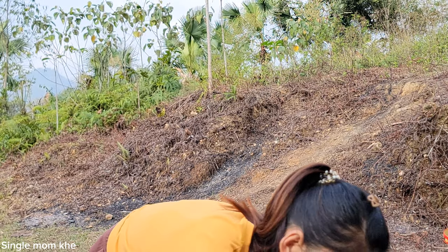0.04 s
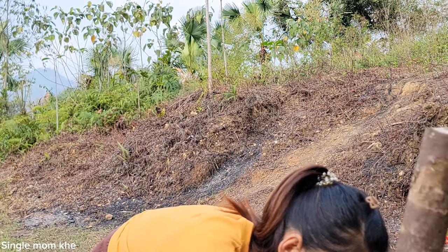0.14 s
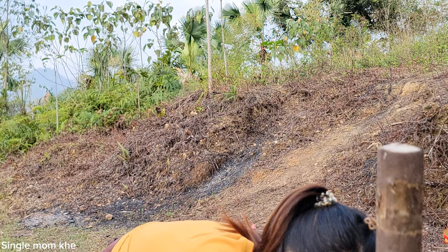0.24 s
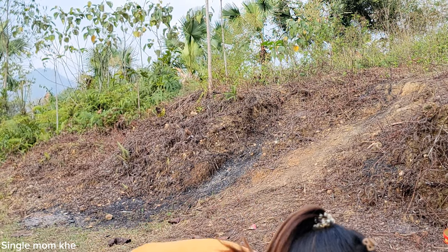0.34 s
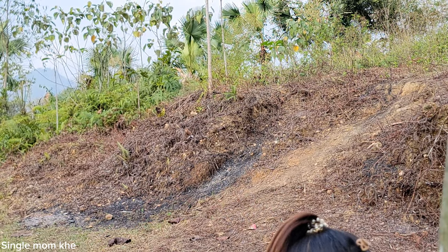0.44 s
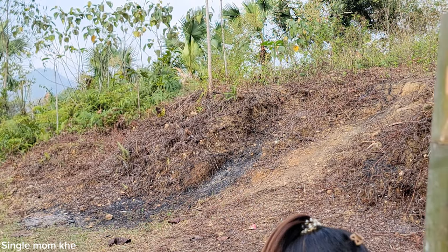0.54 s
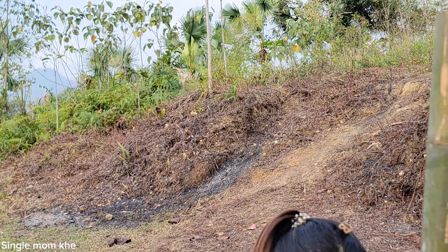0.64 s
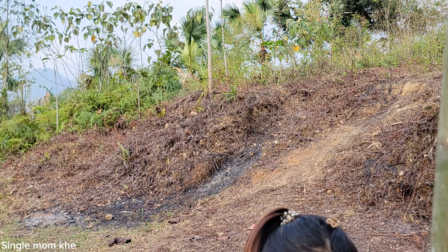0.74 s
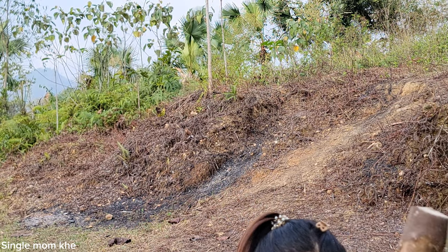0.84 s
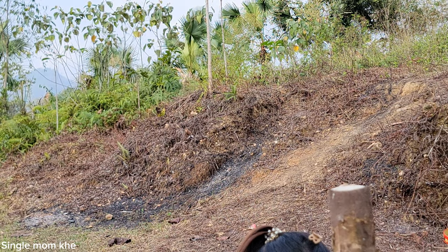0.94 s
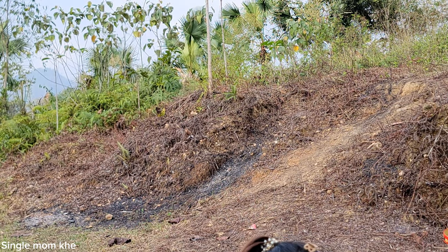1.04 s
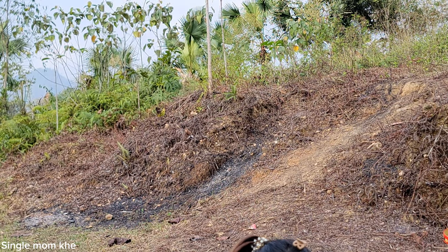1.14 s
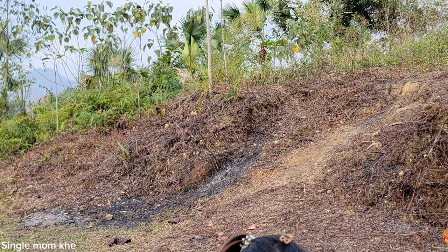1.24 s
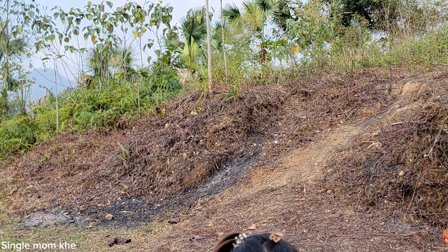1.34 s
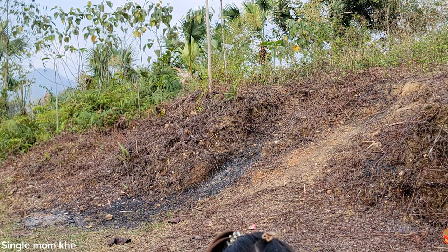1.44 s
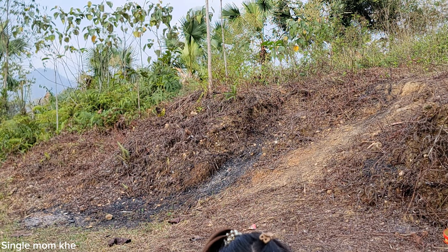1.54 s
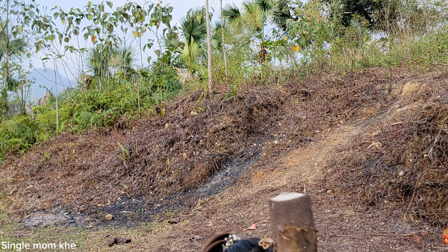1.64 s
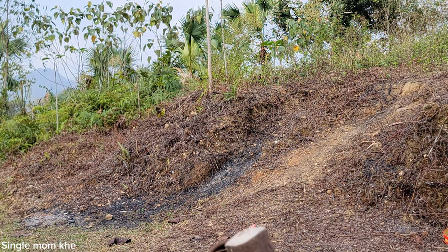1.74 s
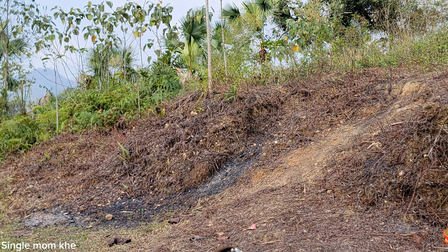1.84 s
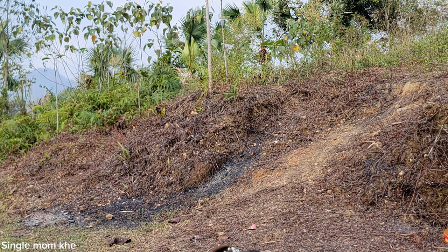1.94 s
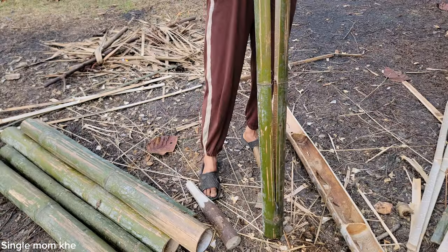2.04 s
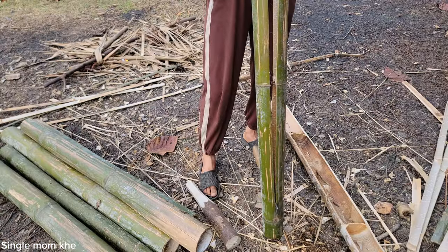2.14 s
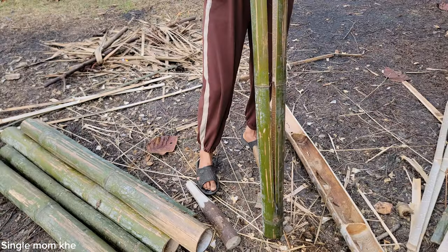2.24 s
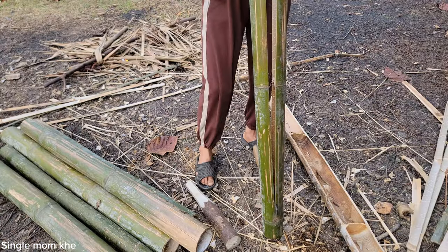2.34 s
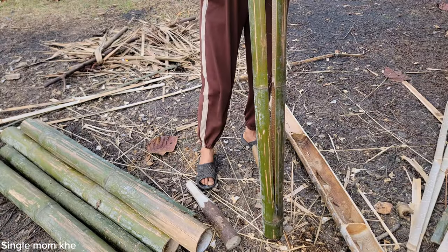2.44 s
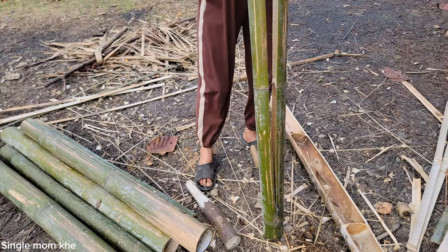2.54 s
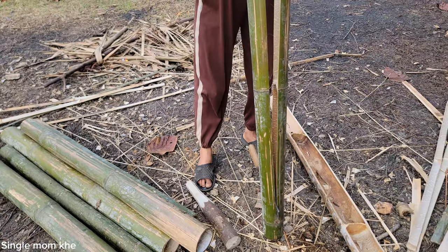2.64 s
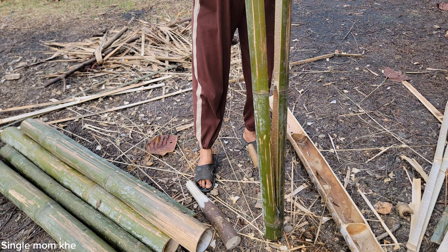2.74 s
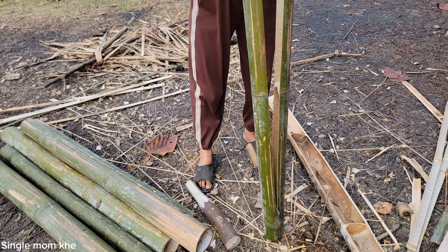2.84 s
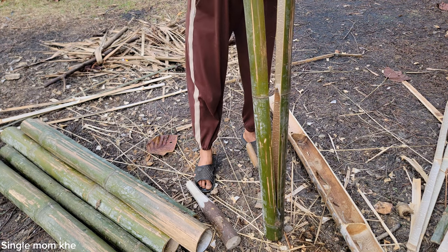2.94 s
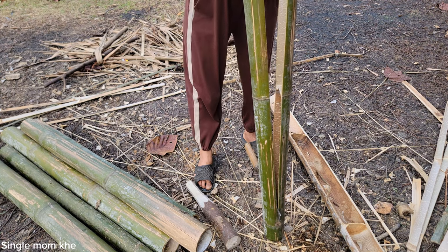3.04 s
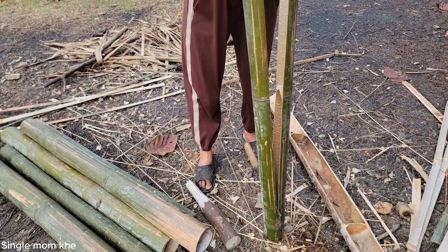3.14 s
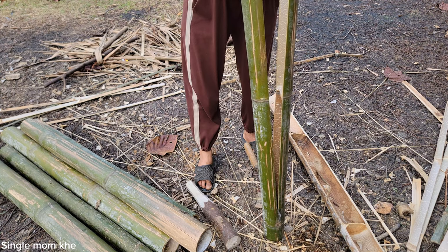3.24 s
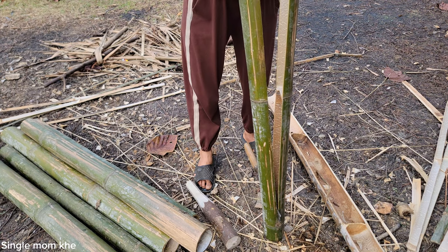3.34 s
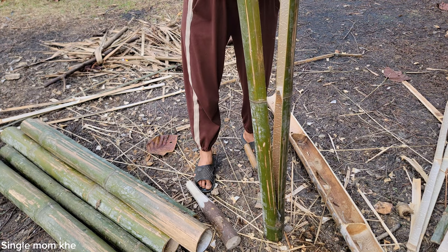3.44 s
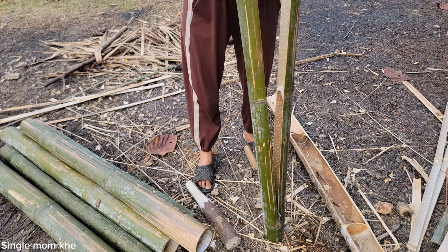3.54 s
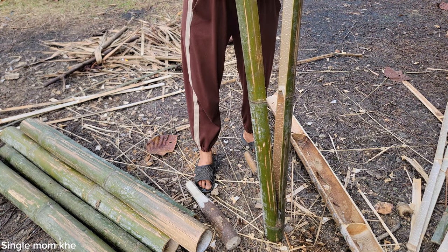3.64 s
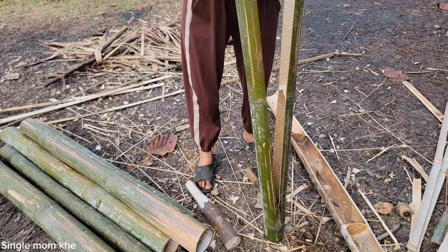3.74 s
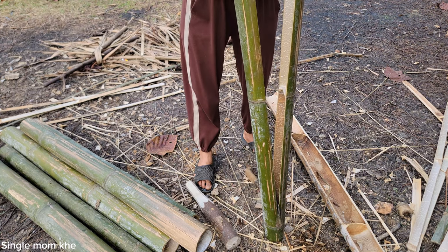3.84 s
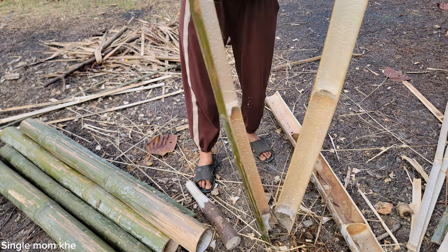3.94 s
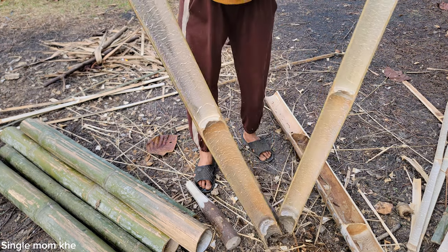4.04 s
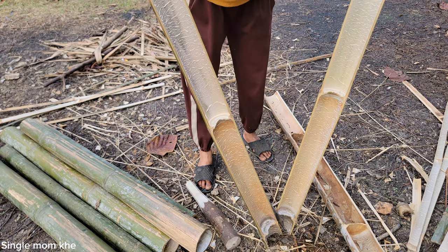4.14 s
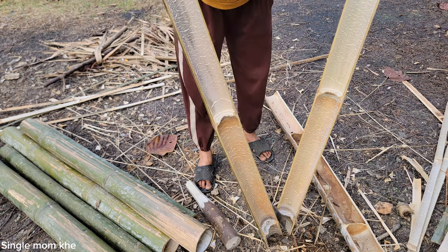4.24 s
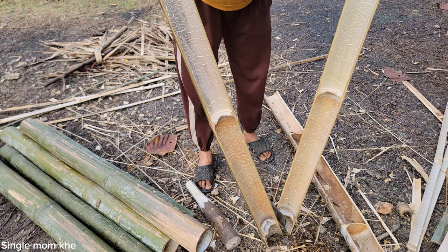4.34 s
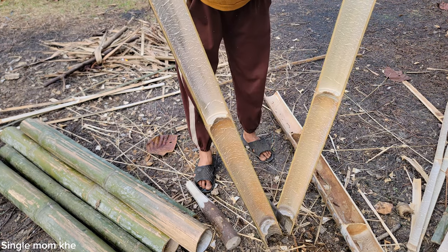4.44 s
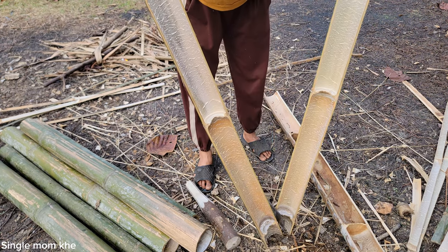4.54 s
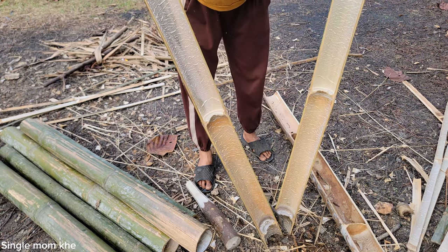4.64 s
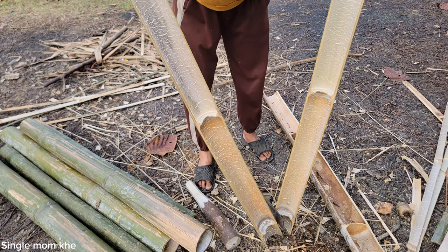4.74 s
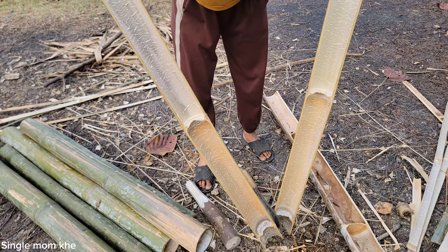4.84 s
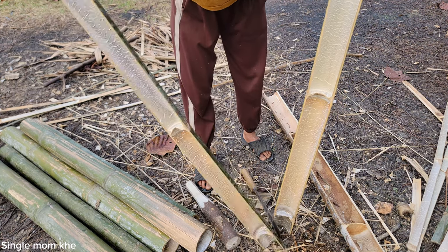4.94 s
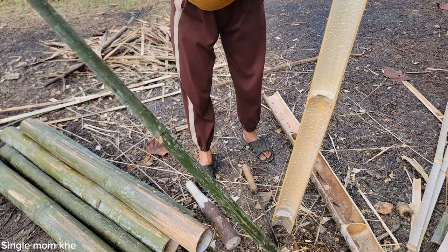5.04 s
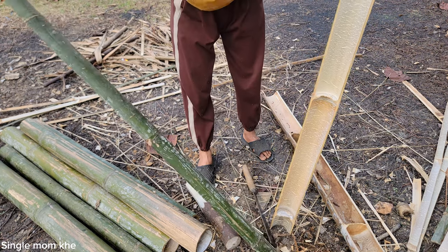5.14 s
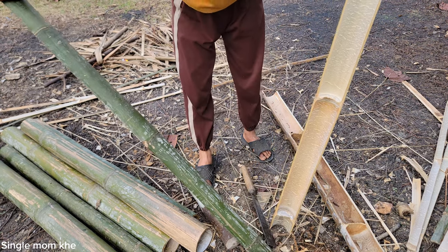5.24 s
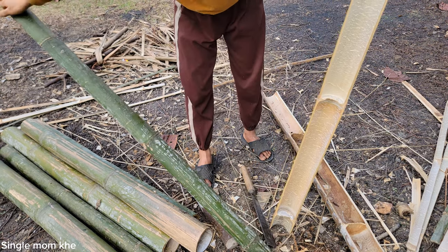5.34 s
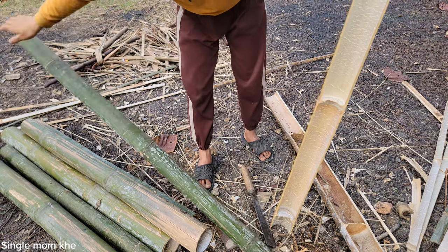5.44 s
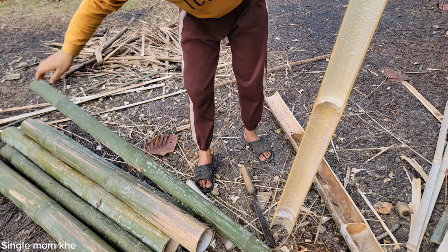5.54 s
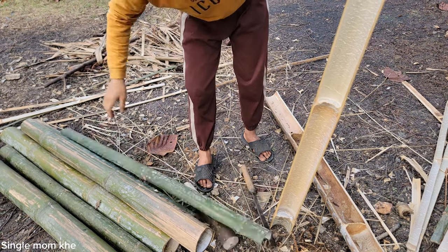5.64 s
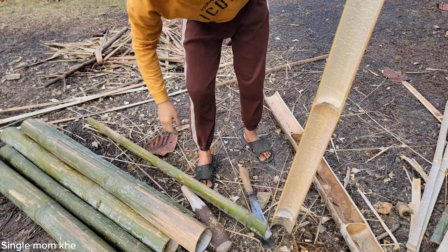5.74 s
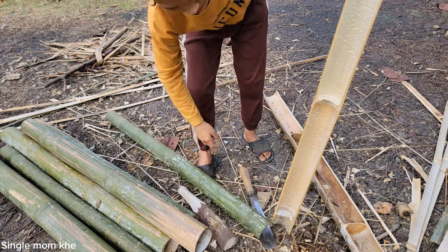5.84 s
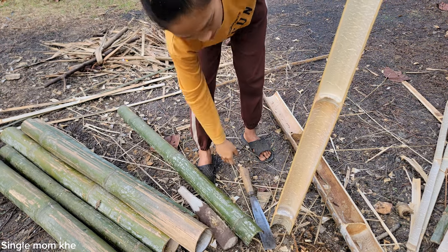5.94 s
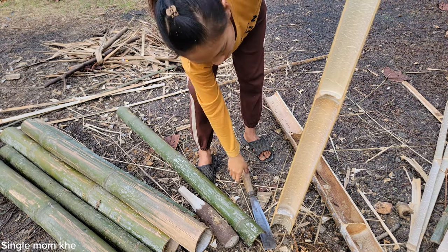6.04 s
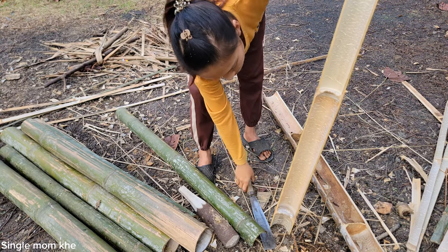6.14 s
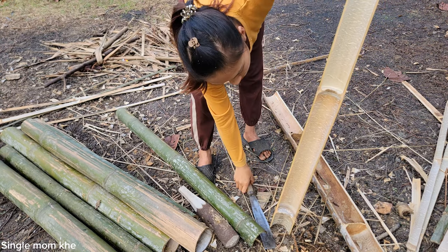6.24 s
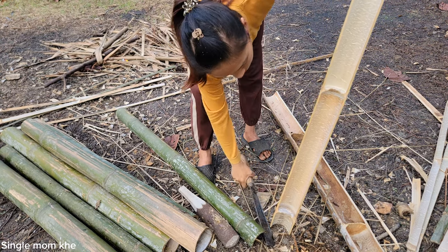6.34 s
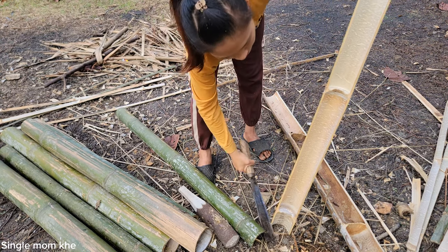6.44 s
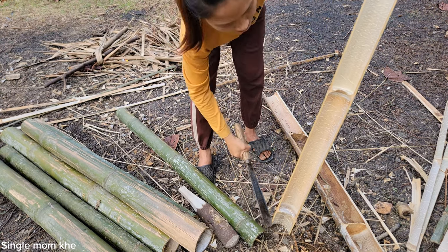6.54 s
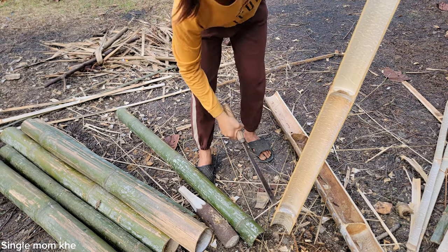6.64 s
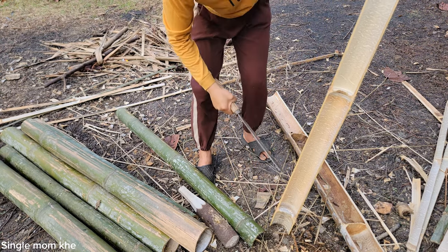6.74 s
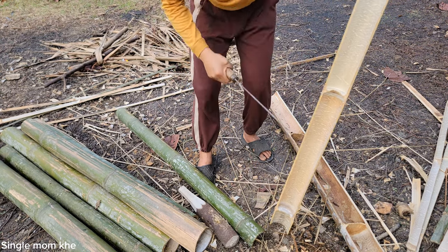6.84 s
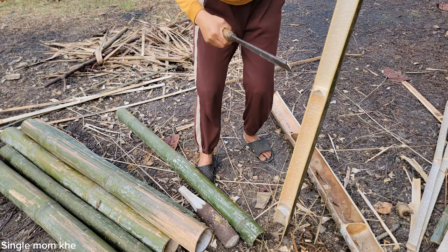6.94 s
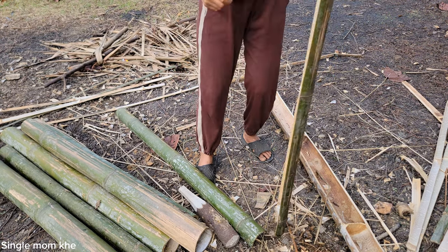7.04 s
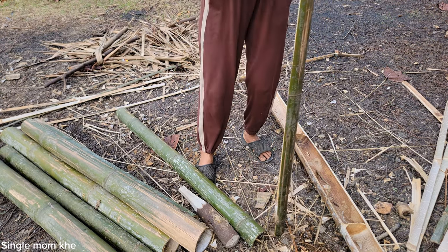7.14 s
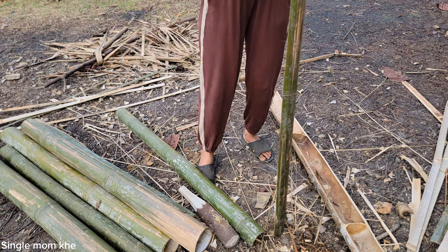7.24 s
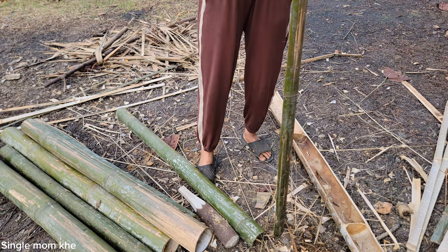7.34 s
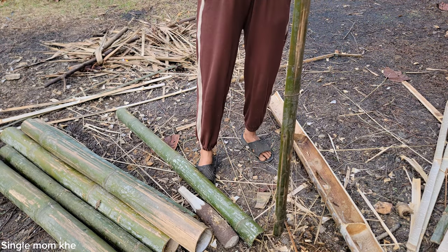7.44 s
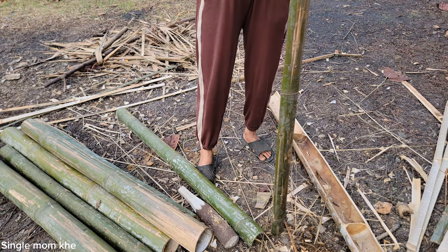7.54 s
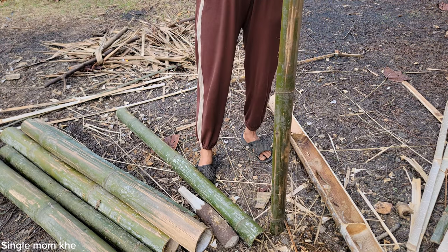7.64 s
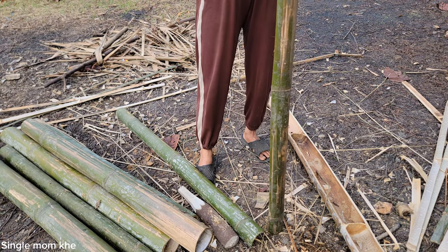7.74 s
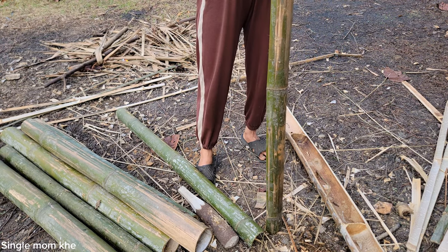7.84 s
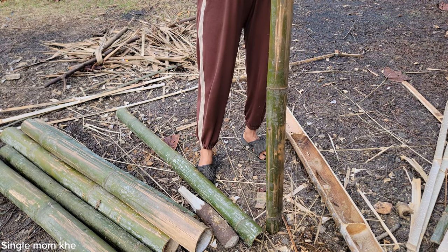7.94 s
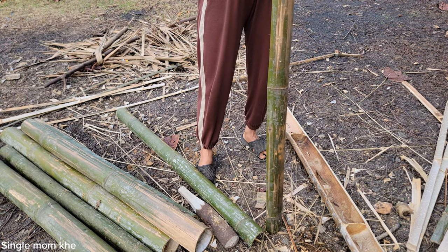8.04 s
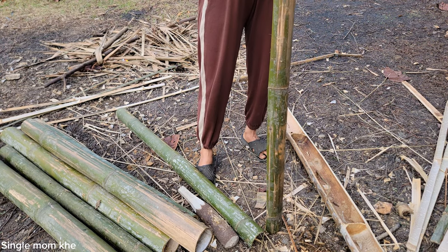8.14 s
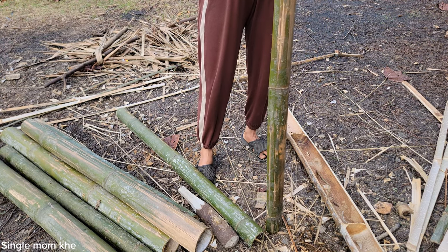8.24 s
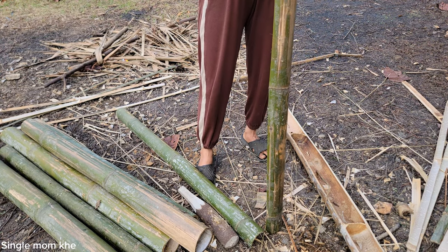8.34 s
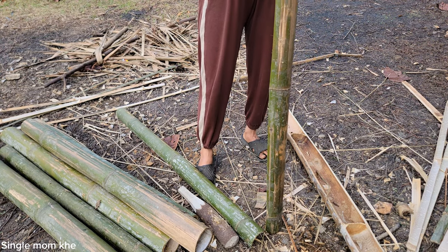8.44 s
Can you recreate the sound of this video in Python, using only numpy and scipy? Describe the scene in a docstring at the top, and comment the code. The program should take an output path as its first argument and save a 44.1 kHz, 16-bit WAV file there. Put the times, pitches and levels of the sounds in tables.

```python
"""A bamboo pole is split in a forest clearing: a club hits a knife three times and the hollow pole rings.
After a sudden change of scene the pole is prised apart, cracking in jumps until its last fibres tear.
One half falls and bounces, bamboo scrapes through dry litter, and the knife is picked up from the ground
and set into the other half. Behind the work, cicadas drone, a small bird calls and the air softly hisses."""
import sys
import numpy as np
from scipy import signal
from scipy.fft import rfft, irfft, next_fast_len
from scipy.io import wavfile
from scipy.ndimage import uniform_filter1d

SR = 44100
rng = np.random.default_rng(int(sys.argv[2]) if len(sys.argv) > 2 else 0)


def digitize_waveform(pressure):
    """Quantize a signal to 16-bit integers and store it at the path in sys.argv[1].

    Rows of a 2-D input are taken as channels; values are limited to [-1, 1].
    """
    field = np.atleast_2d(pressure).T
    bounded = np.clip(field, -1, 1)
    quanta = np.round(bounded * 32767).astype(np.int16)
    wavfile.write(sys.argv[1], SR, quanta)


N = 374409
TIME = np.arange(N) / SR
SCENE_CHANGE_S = 2.07

# A "hit" is one short sound: start_s, level_db, tilt_db_per_octave, pitch_hz.
# More tilt sounds brighter; the hit stirs the notes near its pitch most.
# The club lands on the knife: the four hit columns, then a fainter lead-in just before the blow
# and the blade's bite: lead_in_s, lead_in_db, lead_in_tilt_db_per_octave, bite_delay_s, bite_hz
CLUB_BLOWS = [(.3632, -13, .2, 900, .0098, -18.5, -2.3, .0036, 1110),
              (1.0992, -13, -1.7, 1110, .003, -22, 1, .0085, 1050),
              (1.8652, -12, 1.2, 576, .007, -24, -5, .003, 3000)]
# The wood gives a little after a blow: the four hit columns
SETTLING = [(.4125, -28, 2, 2980), (.673, -50, 3, 1276), (1.352, -57, 6, 3000)]
# Cracks along the grain and a few light knocks: the four hit columns
CRACKS_AND_KNOCKS = [(2.7005, -25, 0, 3010), (2.7085, -19.5, -.5, 1600), (2.946, -27.5, 0, 595),
                     (3.375, -57.5, 7.5, 3600), (3.5105, -23.5, 4.3, 1400), (3.6318, -27, 2.7, 606),
                     (3.697, -48.5, 7, 3010), (3.842, -27, -1, 1442), (3.8485, -14.5, -.7, 1116),
                     (3.941, -35.5, -4, 1450), (3.9765, -45.5, 1, 1900), (4.0165, -50.5, -2.5, 1600),
                     (4.917, -51.5, 1, 1600), (4.988, -52, -1, 1600), (6.672, -62, 8, 3000),
                     (7.279, -52, 4.5, 1600), (7.833, -56.5, 7, 1900), (8.435, -24.5, .7, 1900)]
# The split sticks and slips: the four hit columns, length_s, gap_s
CRACK_RUNS = [(2.7262, -22, 2.7, 3000, .085, .0147), (3.589, -44, 3, 4000, .044, .022)]
# A loose half lands, one end first: the four hit columns, second_end_delay_s, second_end_db
LANDINGS = [(3.718, -49, 1.5, 280, .013, -57.5), (3.786, -42, 2, 1030, .024, -49),
            (3.852, -32.5, -2.5, 290, .025, -48), (5.144, -34, .5, 1830, 0.024, -44),
            (5.472, -53, -3.5, 183, 0.033, -51), (5.5346, -31, -1, 900, .022, -41.5),
            (5.584, -28.5, -3.5, 290, .012, -36), (5.603, -15.5, 2.3, 497, .028, -21.5),
            (5.608, -11.5, .7, 760, .029, -24), (5.708, -33.5, -12.5, 280, .0265, -39),
            (5.7344, -28, 1.5, 2300, .0145, -25), (5.769, -23.5, -1.5, 930, .014, -26.5),
            (5.838, -42, 1, 1270, .027, -36.5), (5.925, -28.5, -3.5, 493, 0.046, -45),
            (6.04, -51.5, 2, 768, .033, -53.5), (7.378, -61, 2.5, 1277, .027, -58.5),
            (7.849, -54, 3.5, 1296, 0.09, -64.5), (8.437, -36.5, -4.5, 300, 0.017, -54)]
# The knife drags over grit: the four hit columns, length_s, gap_s
KNIFE_DRAGS = [(6.41, -56, -4.5, 2200, 0.024, .011), (6.444, -49.5, -4.5, 2400, 0.049, .0095)]

# Notes that ring in the whole pole, the split and a loose half: pitch_hz, level_db, fade_s
# (a fade time is how long a sound takes to drop by 60 dB)
POLE_NOTES = [(123, -27, 0.59), (179.6, -20.5, .7), (318, -18.5, 0.25), (511, -8.5, .17), (600, -13.5, .13),
              (723, -8.5, 0.19), (860, -2.5, 0.027), (1087, 5, 0.038), (1189, -8, 0.17), (1310, -5, 0.13),
              (1453, -9, 0.12), (1776, -14, 0.12), (2211, -16, .11), (2680, -12, .06), (3045, -7.5, 0.07)]
SPLIT_NOTES = [(594, -11, 0.17), (631, -14.5, 0.16), (733, -15, 0.093), (1003, -7.5, .05),
               (1266, -2, 0.057), (1520, -3, 0.017), (1608, -3, 0.091), (1980, -5.5, 0.033),
               (2825, -0.5, 0.037), (3130, 2, 0.038), (3608, -12, 0.035), (4617, -5.5, 0.045),
               (6470, -3.5, 0.028)]
HALF_NOTES = [(182.7, -17, .24), (283.4, -12, .19), (400, -5.5, 0.093), (489.3, -4, .17), (531, -10, 0.22),
              (759.6, -0.5, 0.14), (830.3, -10, 0.2), (1007, -3, 0.13), (1145, -5, .08), (1283, -5, 0.13),
              (1830, -10, 0.09), (2250, -21.5, 0.06), (2482, -9.5, 0.074), (4730, -15.5, .06)]
# Their clatter, a crowd of short-lived overtones: pitch_hz, level_db, fade_s
POLE_CLATTER = [(30, -21, .15), (69.6, -10, .15), (160, -5.5, .12), (300, -1.5, .1), (550, -1.5, 0.053),
                (1120, 0.5, 0.07), (1829, -6, 0.13), (2987, -2, .06), (4470, -12.5, 0.056),
                (6950, -19, 0.058), (9986, -27, .06), (15000, -29, 0.044)]
SPLIT_CLATTER = [(30, -29, .08), (120, -27, .08), (302, -13.5, 0.055), (590, -2.5, 0.053),
                 (1360, 1.5, 0.047), (2300, -1, 0.04), (3190, -3.5, 0.04), (5000, -1, .028),
                 (8000, -6, 0.023), (10500, -15, .022), (13500, -17, .02), (15960, -20, .02)]
HALF_CLATTER = [(30, -52, .09), (55.3, -32.5, .1), (95.1, -17, 0.13), (250, -2.5, 0.11), (500, 0, .09),
                (900, 2, 0.11), (1605, 3, 0.077), (2820, -4, 0.065), (4500, -8, 0.038), (6900, -16.5, .045),
                (10000, -32, 0.041), (15000, -30, 0.055)]

# The pole's foot shifts in dry litter: start_s, length_s, scrape_db, crackle_db (before a 7 dB lift)
PUSHES = [(2.27, .3, -71.5, -79), (3.691, 0.18, -75, -65.5), (4.018, 0.19, -58, -67),
          (4.35, 0.088, -69.5, -72), (4.72, .17, -62, -62.5), (4.859, .15, -57.5, -64.5),
          (4.967, .07, -53, -65), (6.402, 0.084, -60.5, -77), (6.811, 0.21, -54, -66.5),
          (6.947, .2, -64.5, -72), (7.45, .18, -70.5, -79), (7.736, 0.11, -70, -82.5)]
# Tone colour of tearing fibres, soil, dry shavings and still air: pitch_hz, level_db
FIBRE_COLOUR = [(60, -7), (200, -4), (600, -11), (1400, -8.5), (2500, -7.5), (4500, -7.5), (8000, -9),
                (11000, -16.5), (16000, -17.5)]
SOIL_COLOUR = [(60, -7), (200, -14.5), (500, -11.5), (800, -11.5), (1400, 1), (2000, -6), (3000, -13),
               (6000, -28)]
SHAVINGS_COLOUR = [(800, -24.5), (2500, 5.5), (4500, 3), (7500, 3), (10000, -5.5), (16000, -12.5)]
AIR_COLOUR = [(25, -3), (55, -8), (120, -15.5), (300, -27.5), (520, -23), (800, -26), (1300, -24),
              (2500, -29), (6000, -37), (10000, -46), (14000, -38.5), (16000, -42.5)]
# One insect's spells of trilling: start_s, end_s, level_db
TRILLS = [(.66, 1.065, -73.5), (2.08, 2.392, -69), (3.068, 3.481, -68), (4.487, 4.96, -73.5),
          (6.129, 6.56, -75)]
# The bird's calls: start_s, level_db
BIRD_CALLS = [(1.55, -60), (2.108, -59), (2.435, -60.5), (3.068, -60.5), (3.425, -61), (4.172, -66),
              (4.485, -65), (4.815, -62.5), (5.185, -67.5), (6.175, -64), (6.495, -65)]
# Echoes from the slope and trees: pitch_hz, level_db, fade_s
TREE_ECHOES = [(60.13, -8, 0.88), (180, 5.5, 0.99), (400, -4.5, 0.54), (1200, 1, .75), (3000, -2, 0.7),
               (7000, -0.5, 0.46), (15000, -12.5, .3)]
# How alike left and right are for near and far sounds: pitch_hz, likeness (1 means the same)
NEAR_LIKENESS = [(40, 0.9), (250, 0.97), (700, 0.45), (2000, .7), (6000, 0.41), (15000, 0.37)]
FAR_LIKENESS = [(40, 0.73), (250, 0.95), (700, 0.017), (2000, 0.053), (15000, 0.025)]
# Bands from bass to treble: centre_hz, width_hz, filter
EDGES_HZ = np.geomspace(24, 17000, 20)
BANDS = [(np.sqrt(low * high), high - low, signal.butter(2, [low, high], "band", fs=SR, output="sos"))
         for low, high in zip(EDGES_HZ, EDGES_HZ[1:])]


def club_blows():
    """The club drives the knife in, and the whole pole rings until the scene changes."""
    hits = list(SETTLING)
    for start, level_db, tilt, hz, lead_in_s, lead_in_db, lead_in_tilt, bite_s, bite_hz in CLUB_BLOWS:
        hits += [(start - lead_in_s, lead_in_db, lead_in_tilt, hz),   # a fainter lead-in
                 (start, level_db, tilt, hz),   # full blow
                 (start + bite_s, level_db - 3, tilt + 1, bite_hz),   # the blade enters the wood
                 (start + .0148, level_db - 7, tilt + 1.9, 1250)]   # the club chatters once on the blade
    blows = play_hits(hits, POLE_NOTES, POLE_CLATTER, ring_db=-2, snap=11, note_boost_db=12, detune=.006)
    blows = place(blows, lag_ms=.125, pan_db=-.45)
    blows = forest_echoes(blows, near_db=-15, near_fade_s=.13, far_db=-28.5)
    return blows * np.clip((SCENE_CHANGE_S - TIME) / .01, 0, 1)


def splitting():
    """The split runs down the pole in jumps, the last fibres tear, and a few light knocks follow."""
    hits = list(CRACKS_AND_KNOCKS) + stick_slip(CRACK_RUNS) + straining_fibres()
    wood = play_hits(hits, SPLIT_NOTES, SPLIT_CLATTER,
                     ring_db=-6, snap=7.4, note_boost_db=7.5, detune=.016)
    split = place(wood + tearing_fibres(), lag_ms=.068, pan_db=-1.65)
    return forest_echoes(split, near_db=-12, near_fade_s=.087, far_db=-30)


def stick_slip(runs, weaken_db=13, fall_octaves=4, tube_note_hz=600):
    """Sticking and slipping makes a row of nearly even hits that weaken and deepen as the strain eases."""
    hits = []
    for start, level_db, tilt, first_hz, length, gap in runs:
        for delay in np.arange(0, length, gap):
            progress = delay / length
            jitter_s = gap * rng.normal(0, .02)
            hz = max(first_hz / 2 ** (fall_octaves * progress), tube_note_hz)
            hits.append((start + delay + jitter_s, level_db - weaken_db * progress ** 3, tilt, hz))
    return hits


def straining_fibres(start_s=3.6, length_s=.24, count=3, level_db=-62, growth_db=7, tilt=5.5, hz=3000):
    """Single fibres snap at random, louder as the strain builds."""
    strains = (np.arange(count) + rng.random(count)) / count
    return [(start_s + strain * length_s, level_db + growth_db * strain ** 2, tilt, hz)
            for strain in strains]


def tearing_fibres(start_s=3.83, rise_s=.015, hold_s=.098, level_db=-40.5, surge_db=13, surge_s=.012):
    """The last fibres let go with a surge, rip steadily and quickly fall quiet."""
    t = TIME - start_s - rise_s
    gain = from_db(level_db + surge_db * np.exp(-np.abs(t) / surge_s))
    rise = np.clip(1 + t / rise_s, 0, 1)
    release = decay(np.clip(t - hold_s, 0, 1), fade_s=.2)
    rip = coloured(tiny_snaps(per_s=2100, spread_db=1), FIBRE_COLOUR, NEAR_LIKENESS)
    return gain * rise * release * rip


def loose_half():
    """A half pole bumps, falls and bounces: one end lands, then the other, which rebounds once."""
    hits = []
    for start, level_db, tilt, hz, gap, second_db in LANDINGS:
        hits += [(start, level_db, tilt, hz),
                 (start + gap, second_db, tilt + 1.2, hz * 1.02),   # the second end sounds brighter
                 (start + gap * 2.05, second_db - 10, tilt, hz)]
    bumps = play_hits(hits, HALF_NOTES, HALF_CLATTER, ring_db=1.5, snap=5.5, note_boost_db=9, detune=.006)
    falling = (TIME > 5.45) & (TIME < 6.3)
    fall = place(bumps * falling, lag_ms=-.12, pan_db=-1)   # reaches the left side first
    handling = place(bumps * ~falling, lag_ms=.065, pan_db=-1.5)
    return forest_echoes(fall + handling, near_db=-11, near_fade_s=.13, far_db=-31)


def knife_pickup():
    """The blade grates over grit, and its tip taps as it leaves the ground."""
    tip_hit = (6.495, -45.5, -3.5, 1450)
    ticks = play_hits([tip_hit] + stick_slip(KNIFE_DRAGS), HALF_NOTES, SPLIT_CLATTER,
                      ring_db=-14.5, snap=6, note_boost_db=4, detune=.029, clatter_boost_db=8.5)
    return place(ticks, lag_ms=.044, pan_db=-3)


def dry_litter(rise_share=.25, rise_db=12, fall_db=15):
    """Bamboo scrapes over soil and crushes dry shavings; each push swells, then fades."""
    gains = np.zeros((2, N))
    for start, length, scrape_db, crackle_db in PUSHES:
        past_peak = np.arange(int(2 * length * SR)) / (length * SR) - rise_share
        swell_db = np.minimum(rise_db * past_peak / rise_share, -fall_db * past_peak / (1 - rise_share))
        add(gains, start, from_db([scrape_db + swell_db, crackle_db + 7 + swell_db]))
    scrape = gains[0] * coloured(tiny_snaps(per_s=3800, spread_db=2.2), SOIL_COLOUR, NEAR_LIKENESS)
    crackle = gains[1] * coloured(tiny_snaps(per_s=1000, spread_db=2), SHAVINGS_COLOUR, NEAR_LIKENESS)
    rustle = place(scrape + crackle, lag_ms=.089, pan_db=-2)
    return forest_echoes(rustle, near_db=-3, near_fade_s=.12, far_db=-33)


def insects():
    """Far cicadas drone at two pitches while one insect trills with an uneven throb."""
    high = background_gain(before_db=-65, after_db=-69.5, loss_db_per_s=.48) * drone(7490, width_hz=1000)
    low = background_gain(before_db=-70, after_db=-75.8, loss_db_per_s=.1) * drone(4550, width_hz=700)
    spells = sum(from_db(level_db) * ((TIME > start) & (TIME < end)) for start, end, level_db in TRILLS)
    beats_s = np.cumsum(rng.uniform(.05, .085, 200))
    throb = 1 + .45 * np.sin(2 * np.pi * np.interp(TIME, beats_s, np.arange(len(beats_s))))
    trill = uniform_filter1d(spells, size=3000) * throb * drone(4367, width_hz=185)
    return place(high + low + trill, lag_ms=0, pan_db=1.9)


def bird(length_s=.13, rise_s=.016, release_s=.04, base_hz=2500, flick_hz=1390, curl_hz=761):
    """A thin whistle flicks up and back, then curls upward more softly, blurred by the trees."""
    calls = np.zeros((2, N))
    t = np.arange(0, length_s, 1 / SR)
    flick = np.exp(-((t - .027) / .012) ** 2)
    tune_hz = base_hz + flick_hz * flick + curl_hz * (t / length_s) ** 2
    shape = np.clip(np.minimum(t / rise_s, (length_s - t) / release_s), 0, 1)
    shape *= from_db(10 * (flick - 1))   # the tail is 10 dB softer than the flick
    for start, level_db in BIRD_CALLS:
        hz = tune_hz * (1 + rng.normal(0, .02))
        add(calls, start, from_db(level_db) * shape * np.sin(2 * np.pi * np.cumsum(hz) / SR))
    return forest_echoes(calls, near_db=-2, near_fade_s=.28, far_db=-10)


def forest_air():
    """Still air makes a faint rumble and hiss."""
    hush = coloured(rng.standard_normal((2, N)), AIR_COLOUR, FAR_LIKENESS)
    return background_gain(before_db=-65, after_db=-70, loss_db_per_s=.1) * hush


def forest_echoes(sound, near_db, near_fade_s, far_db):
    """Add quick echoes from the ground and things nearby, and a faint tail from the trees."""
    t = np.arange(SR) / SR
    noise = rng.standard_normal((2, 2, SR))
    near = far = 0
    for k, (hz, _, band_filter) in enumerate(BANDS):
        level_db, fade_s = at_hz(TREE_ECHOES, hz)
        scatter = signal.sosfilt(band_filter, stereo(noise[k % 2], at_hz(FAR_LIKENESS, hz)[0]))
        near = near + scatter * decay(t, near_fade_s)
        far = far + from_db(level_db) * scatter * decay(t, fade_s)
    build_up = 1 - decay(t, .033)
    echoes = (from_db(near_db) * unit_level(near) + from_db(far_db) * unit_level(far)) * build_up
    return sound + signal.fftconvolve(sound, echoes / np.sqrt(SR), axes=1)[:, :N]


def play_hits(hits, notes, clatter, ring_db, snap, note_boost_db, detune, clatter_boost_db=4.5):
    """Each hit makes a sharp snap, a burst of clatter and a set of ringing notes."""
    track = np.zeros((2, N))
    t = np.arange(int(.6 * SR)) / SR
    burst_samples = SR // 6
    note_hz, note_db, note_fade_s = np.transpose(notes)
    tones = np.sin(2 * np.pi * note_hz[:, None] * t) * decay(t, note_fade_s[:, None])
    fades = [decay(t[:burst_samples], at_hz(clatter, hz)[1]) for hz, _, _ in BANDS]
    for start, level_db, tilt, pitch_hz in hits:
        burst = np.zeros((2, len(t)))
        noise = rng.standard_normal((2, 2, burst_samples))
        for k, (hz, width_hz, band_filter) in enumerate(BANDS):
            push = stereo(noise[k % 2], at_hz(NEAR_LIKENESS, hz)[0]) * fades[k]
            push[:, 0] += snap * (-1) ** k
            boost_db = clatter_boost_db * closeness(hz, pitch_hz, octaves=.32)
            gain = np.sqrt(width_hz) * from_db(at_hz(clatter, hz)[0] + boost_db + tilt * np.log2(hz))
            burst[:, :burst_samples] += gain * unit_level(signal.sosfilt(band_filter, push))
        # the spot that is struck favours the notes near one pitch
        boost_db = note_boost_db * closeness(note_hz, pitch_hz, octaves=.25)
        chance_db = rng.normal(0, .59, (2, len(notes)))
        strengths = from_db(note_db + boost_db + tilt * np.log2(note_hz) + chance_db)
        ring = (strengths * rng.choice([-1, 1], len(notes))) @ tones
        # the notes shift as the split grows or the support changes
        speed = 1 + detune * rng.standard_normal()
        ring = np.array([np.interp(t * speed, t, side) for side in ring])
        # a soft, dull hit gives more ring and less clatter
        sound = unit_level(unit_level(burst) + from_db(ring_db - .8 * tilt) * unit_level(ring))
        # the hit holds as much energy as 10 ms of steady sound at level_db
        add(track, start, from_db(level_db) * np.sqrt(.01 / t[-1]) * sound)
    return track


def tiny_snaps(per_s, spread_db):
    """Random clicks of very uneven size."""
    sizes = from_db(spread_db * np.minimum(rng.exponential(1, N), 4))
    return (rng.random(N) < per_s / SR) * sizes * rng.standard_normal((2, N))


def drone(hz, width_hz):
    """Noise filtered twice around one pitch, so that it sings."""
    peak = signal.iirpeak(hz, hz / width_hz, fs=SR)
    once = signal.lfilter(*peak, rng.standard_normal((2, N)))
    return unit_level(signal.lfilter(*peak, once))


def background_gain(before_db, after_db, loss_db_per_s):
    """A level that steps down when the scene changes, then slowly sinks."""
    since_s = TIME - SCENE_CHANGE_S
    return from_db(np.where(since_s < 0, before_db, after_db - loss_db_per_s * since_s))


def coloured(noise, colour, likeness):
    """Give two noises a tone colour and a stereo width."""
    size = next_fast_len(N)
    hz = np.fft.rfftfreq(size, 1 / SR) + 1
    spectrum = stereo(rfft(noise, size), at_hz(likeness, hz)[0])
    gains = from_db(at_hz(colour, hz)[0]) * (hz > EDGES_HZ[0])
    return unit_level(irfft(spectrum * gains, size)[:, :N])


def place(sound, lag_ms, pan_db):
    """Make the left side lag_ms later and pan_db louder than the right."""
    size = next_fast_len(N + 64)
    delay = np.exp(-2j * np.pi * np.fft.rfftfreq(size, 1 / SR) * lag_ms / 1000)
    left = irfft(rfft(sound[0], size) * delay, size)[:N]
    return np.array([left * from_db(pan_db / 2), sound[1] * from_db(-pan_db / 2)])


def stereo(noises, likeness):
    """Blend two unrelated noises into left and right with a given likeness."""
    return np.sqrt(1 + likeness) * noises[0] + np.sqrt(1 - likeness) * noises[1] * np.array([[1], [-1]])


def closeness(hz, pitch_hz, octaves):
    """1 at pitch_hz, falling towards 0 on either side."""
    return np.exp(-(np.log2(hz / pitch_hz) / octaves) ** 2)


def at_hz(table, hz):
    """Read a table's columns at any pitch, sliding between its rows."""
    row_hz, *columns = np.transpose(table)
    return [np.interp(np.log(hz), np.log(row_hz), column) for column in columns]


def decay(t, fade_s):
    """A fade that loses 60 dB in fade_s."""
    return np.exp(-np.log(1000) * t / fade_s) + 1e-12


def add(track, start_s, sound):
    """Mix a sound into the track at start_s."""
    i = round(start_s * SR)
    track[..., i:i + sound.shape[-1]] += sound[..., :N - i]


def from_db(db):
    """Turn decibels into a gain."""
    return 10 ** (np.asarray(db) / 20)


def unit_level(sound):
    """Scale a sound to an average (rms) level of 1."""
    return sound / np.sqrt(np.mean(sound ** 2) + 1e-30)


def scene():
    """The work in front, the forest behind."""
    work = club_blows() + splitting() + loose_half() + knife_pickup() + dry_litter()
    return work + insects() + bird() + forest_air()


def record(dry):
    """The microphone thins the deepest bass; the tallest peaks are rounded and the top treble is cut."""
    bass_cut = signal.butter(1, 38, "high", fs=SR, output="sos")
    treble_cut = signal.cheby2(16, 60, 16900, fs=SR, output="sos")
    return signal.sosfilt(treble_cut, np.tanh(signal.sosfilt(bass_cut, dry)))


dry = scene()
out = record(dry)
digitize_waveform(out)
```